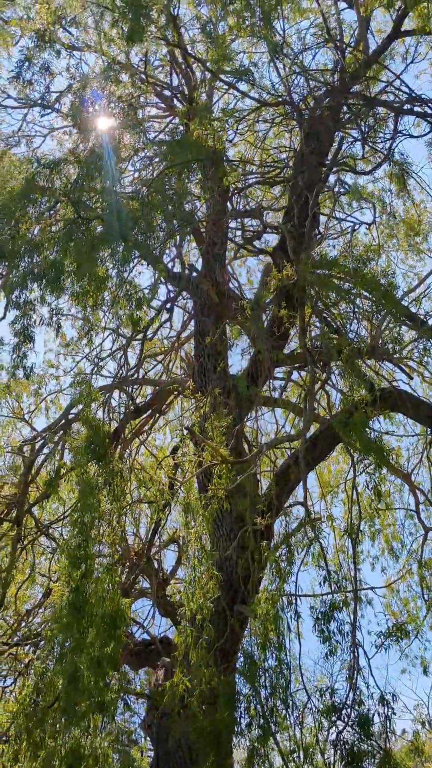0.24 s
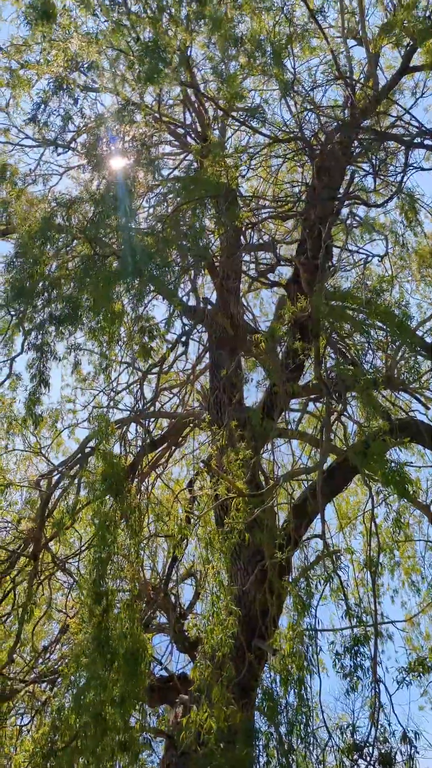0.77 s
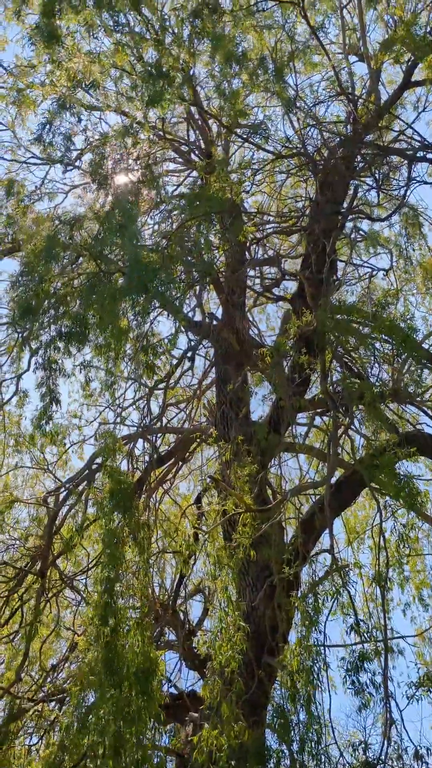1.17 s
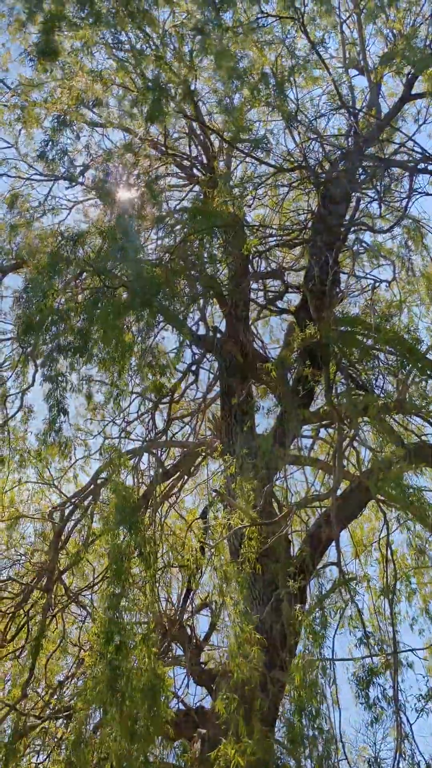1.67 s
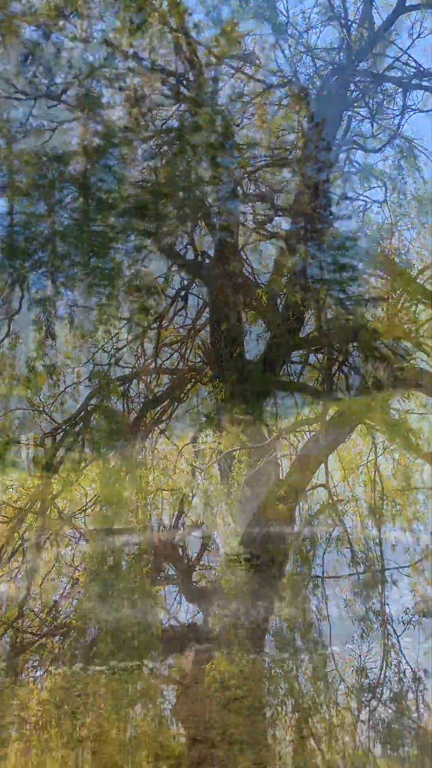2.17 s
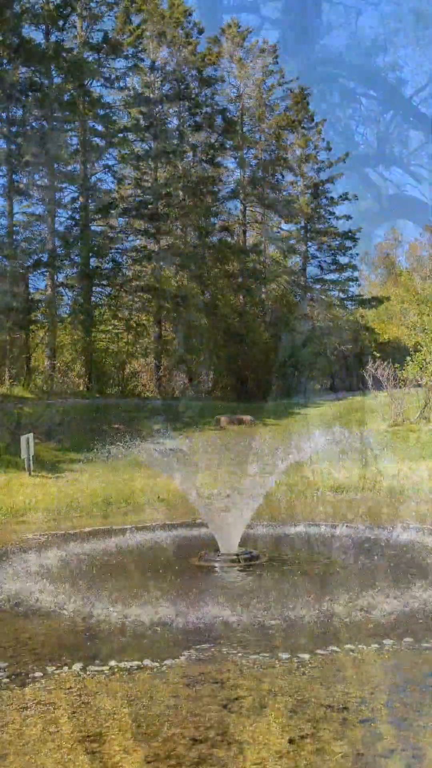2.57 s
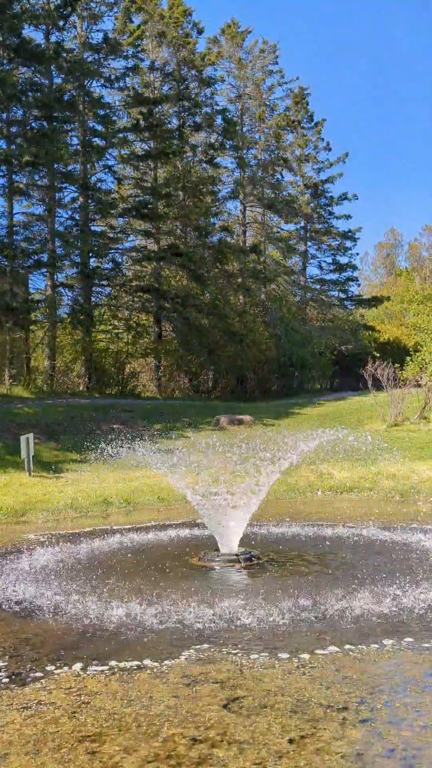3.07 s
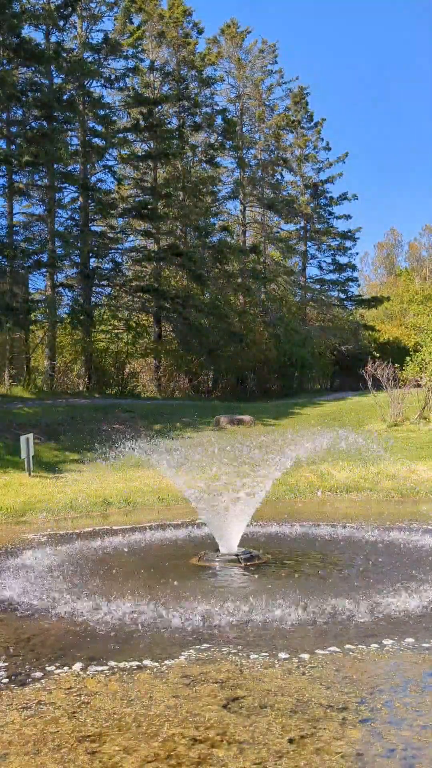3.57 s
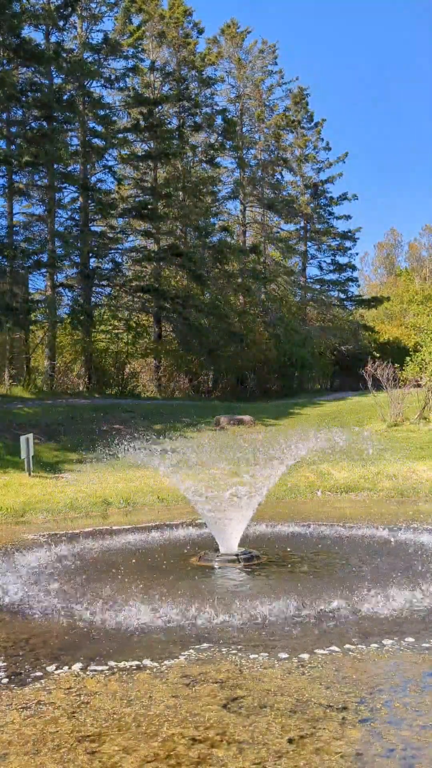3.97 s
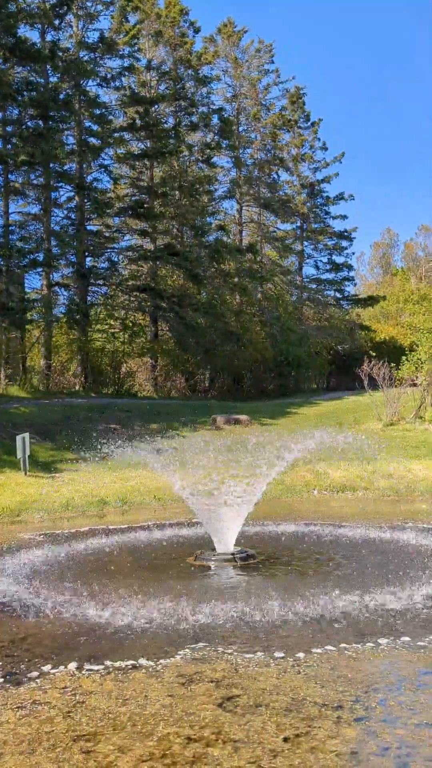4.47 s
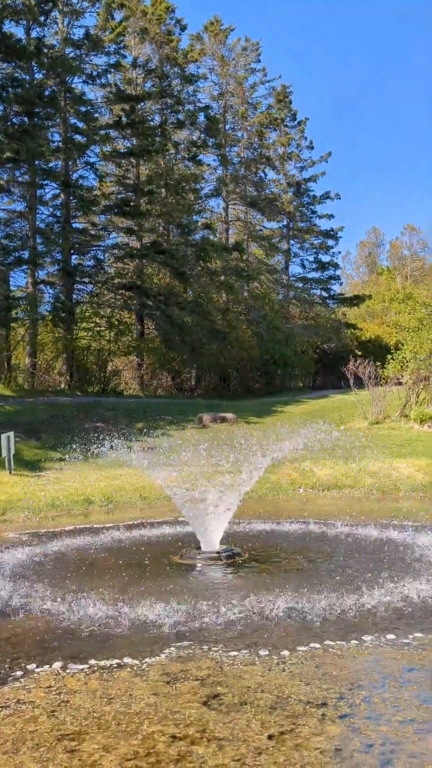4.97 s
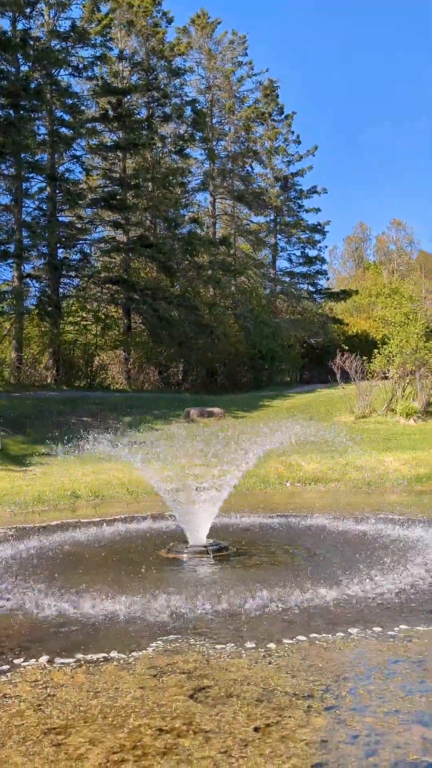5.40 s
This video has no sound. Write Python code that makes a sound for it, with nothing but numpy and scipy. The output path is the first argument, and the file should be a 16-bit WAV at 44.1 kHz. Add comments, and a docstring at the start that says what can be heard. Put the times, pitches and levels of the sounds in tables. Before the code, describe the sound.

From 0 to 1.5 s the park is very quiet: short, soft grass rustles at the start, near 0.5 s and from about 1.0 to 1.35 s, with tiny stalk snaps. A hush of leaves lies beneath, and low wind buffets mostly the right side, stronger around 0.6-1.2 s. Distant birds are barely audible: high notes at 0.1 and 1.3 s, a faint low one near 0.75 s. At 1.53 s a very quick fade brings in a far louder fountain, with a tiny dip near 1.68 s. Broad, bright spray hisses steadily on water, slightly brighter on the right, growing gently to the end. Countless drops tick; small plops ring irregularly, crowding around 3.7 s and 5.0-5.4 s. Sharp spatters stand out near 2.7, 3.1 and 5.1 s, with soft rising bloops mostly between 2.4 and 4.1 s. A low pump hum sits underneath. At 5.52 s a wind gust thumps both sides, then flutters.

```python
"""A few quiet steps rustle through grass in a park, close by, with wind on the two microphone ports and
a few distant birds; then a quick fade to a pond fountain. Its ring of spray hisses on the water, drops
tick and trap small bubbles, the pump hums below, and a last gust thumps the microphone. Noise is coloured
for spray, grass, leaves, pump and wind; decaying sines make bubbles, drops and snaps; near-sines, birds."""
import sys
import numpy as np
from scipy import signal
from scipy.fft import rfft, irfft
from scipy.io import wavfile
from scipy.ndimage import uniform_filter1d

SR = 44100
rng = np.random.default_rng(int(sys.argv[2]) if len(sys.argv) > 2 else 0)


def generate_wav(signal):
    """Clip the signal to [-1, 1] and save it as 16-bit WAV at the path in sys.argv[1]."""
    frames = np.transpose(np.atleast_2d(signal))
    scaled = np.clip(frames, -1, 1) * 32767
    pcm = np.round(scaled).astype(np.int16)
    wavfile.write(sys.argv[1], SR, pcm)


def attenuation_scalar(level_db):
    """Turn a level in dB into a linear amplitude multiplier (20 dB per decade)."""
    decades = np.asarray(level_db, float) / 20
    return 10 ** decades


N = 248724

PARK_END_S = 1.527  # the park ends and the fountain starts
RING_LAG = 4.72  # samples by which the left port hears the fountain later
# How the fountain fades in. Each row: time in seconds, level in dB.
FOUNTAIN_LEVEL = [(1.55, -38), (2.34, -35.5), (3.6, -34), (3.75, -33), (5.64, -32.5)]


def evened(x):
    """Scales to rms 1."""
    return x / np.sqrt(np.mean(x ** 2) + 1e-20)


def read_spectrum(points, hz):
    """Reads a table of (Hz, value) on a log frequency axis."""
    f, value = np.transpose(points)
    return np.interp(np.log(hz + 1), np.log(f + 1), value)


def level_curve(rows):
    """A table of (s, dB) drawn out to every sample."""
    return np.interp(np.arange(N) / SR, *np.transpose(rows))


def colour(x, points):
    """Filters by a spectrum of (Hz, dB)."""
    gain = attenuation_scalar(read_spectrum(points, np.fft.rfftfreq(N, 1 / SR)))
    return irfft(rfft(x) * gain, N)


def ports(x, lag):
    """One direction heard by two ports: the left one lags by some samples."""
    turn = np.exp(-2j * np.pi * lag * np.fft.rfftfreq(N))
    return np.array([irfft(rfft(x) * turn, N), x])


def swell(start, length, db, change_db, rise_s, fall_db_per_s):
    """Quick rise, a hold that drifts in level, then an even fall in dB."""
    t = np.arange(N) / SR - start
    level_db = db + change_db * np.clip(t / length, 0, 1)
    level_db -= fall_db_per_s * np.maximum(t - length, 0)
    return np.clip(t / rise_s, 0, 1) * attenuation_scalar(level_db)


def hiss(count, patchy_db, flicker_db):
    """White noises that share drifting time-frequency patches and a wide-band flicker."""
    shape = (N // 64 + 5, 129)
    patches = uniform_filter1d(rng.standard_normal(shape), 6, 1)
    patches = evened(uniform_filter1d(patches, 30, 0))
    flicker = evened(uniform_filter1d(rng.standard_normal(shape[0]), 12))[:, None]
    z = rng.standard_normal((count, *shape)) + 1j * rng.standard_normal((count, *shape))
    z *= attenuation_scalar(patchy_db * patches + flicker_db * flicker)
    noise = signal.istft(z.transpose(0, 2, 1), nperseg=256, noverlap=192)[1]
    return evened(noise[:, :N])


def bubble(hz, t60, glide=0.05, rise=0.4):
    """A trapped bubble rings and climbs in pitch as it nears the surface; peak 1."""
    t = np.arange(3000) / SR
    wave = np.sin(2 * np.pi * hz * t * (1 + glide * t / t60))
    wave *= attenuation_scalar(np.maximum(-60 * t / t60, -200)) * (t < 1.5 * t60)
    wave *= 1 - np.exp(-t * hz / rise)  # rise in cycles
    return wave / abs(wave).max()


def random_drops(count, per_s, lo_hz, hi_hz, cycles, spread_db, glide=0.17):
    """Random drops, one stream a direction; each of 12 sizes has its own train of hits."""
    out = np.zeros((count, N))
    draw = rng.random((count, N))
    strength = attenuation_scalar(spread_db * np.minimum(rng.exponential(1, (count, N)), 4))
    kind = rng.integers(0, 12, (count, N))
    for k, hz in enumerate(np.geomspace(lo_hz, hi_hz, 12)):
        shape = np.trim_zeros(bubble(hz, cycles / hz, glide), "b")
        hits = strength * (draw < per_s / count / SR) * (kind == k)
        # small drops spread over a wider band, so their energy grows with pitch
        shape = shape[None] * np.sqrt(hz) / np.linalg.norm(shape)
        out += signal.oaconvolve(hits, shape, axes=1)[:, :N]
    return evened(out)


def place_bubbles(events, lag, **shape):
    """Places single bubbles, rows of (s, peak dB, Hz, t60 s, left-right dB)."""
    out = np.zeros((2, N + 4000))
    for s, db, hz, t60, pan_db in events:
        at = round(s * SR)
        wave = attenuation_scalar(db) * bubble(hz, t60, **shape)
        out[0, at + round(lag):][:len(wave)] += wave * attenuation_scalar(pan_db / 2)
        out[1, at:at + len(wave)] += wave * attenuation_scalar(-pan_db / 2)
    return out[:, :N]


def fountain():
    """Spray and drops on the water, with large and deep bubbles and spatters that stand out."""
    return attenuation_scalar(level_curve(FOUNTAIN_LEVEL)) * splash() + large_bubbles() + spatters() + deep_bubbles()


def splash():
    """Spray lands along a ring, each part with its own lag; the rest reaches each port scattered."""
    # Share of the splash that comes straight from the ring. Each row: Hz, share from 0 to 1.
    direct = [(600, 0.96), (1400, 0.9), (2500, 0.65), (4500, 0.61), (6800, 1), (8000, 0), (9300, 0.48),
              (12000, 0.7), (14000, 0)]
    # Colour at each port, the left one shaded by the body. Each row: Hz, relative dB per Hz.
    spray_left = [(150, -8), (420, -9), (600, -6.5), (830, -10.5), (1400, -4), (2300, -2), (4300, -4),
                  (5400, -9.5), (6600, -10), (7700, -14), (10000, -13.5), (12000, -5), (14000, -16),
                  (15600, -10.5)]
    spray_right = [(150, -8.5), (420, -8.5), (600, -4.5), (830, -9), (1400, -1.5), (1900, -1.5),
                   (3800, -0.5), (5400, -4.5), (7000, -1.5), (8200, -7.5), (9400, -2), (11000, -6.5),
                   (12500, -2), (14000, -12), (15600, -13)]
    ring_width = 0.98  # samples by which the lag spreads to either side across the ring

    parts = hiss(count=5, patchy_db=1.0, flicker_db=0.98)
    # drops come in bunches
    bunches = attenuation_scalar(1.3 * evened(uniform_filter1d(rng.standard_normal(N), size=1200)))
    middle = random_drops(count=5, per_s=700, lo_hz=950, hi_hz=2900, cycles=20, spread_db=3.2)
    fine = random_drops(count=5, per_s=3000, lo_hz=3430, hi_hz=14200, cycles=11, spread_db=3.0)
    low = random_drops(count=5, per_s=67, lo_hz=349.3, hi_hz=900, cycles=36.0, spread_db=2.0, glide=0.615)
    parts += attenuation_scalar(-9.5) * bunches * middle + attenuation_scalar(-4.5) * fine + attenuation_scalar(-23) * low

    lags = RING_LAG + ring_width * np.linspace(-1, 1, 3)
    ring = sum(ports(part, lag) for part, lag in zip(parts, lags)) / np.sqrt(3)
    scattered = parts[3:]
    share = np.clip(read_spectrum(direct, np.fft.rfftfreq(N, 1 / SR)), 0, 1)
    left, right = irfft(np.sqrt(share) * rfft(ring) + np.sqrt(1 - share) * rfft(scattered), N)
    return evened(np.array([colour(left, spray_left), colour(right, spray_right)]))


def large_bubbles():
    """Each large bubble rings briefly, with a shorter, higher slap at its onset."""
    # Each row: start in seconds, peak in dB of the ring, starting pitch in Hz, left-right in dB.
    plops = [(1.536, -27, 2050, 8), (1.614, -32.5, 1430, 0), (1.692, -26.5, 1980, -1.0),
             (1.697, -31, 1500, -1.5), (1.951, -26.5, 1520, 0), (2.018, -29.5, 1770, -1.0),
             (2.3263, -24.5, 1660, -1.5), (2.506, -40, 1520, -1.5), (2.614, -29, 2500, -4),
             (2.667, -27, 1460, -1), (2.864, -24, 2200, -2), (2.901, -31, 2070, -3), (3.153, -31, 1380, -4),
             (3.223, -28, 1970, -4), (3.364, -30.5, 1340, -2.5), (3.714, -23.5, 1600, 0),
             (3.717, -37, 1070, -3), (3.738, -27, 2000, -2.5), (3.778, -31, 1800, -2.5),
             (3.866, -30, 1420, -3), (4.063, -27, 2340, -2.5), (4.252, -26, 2800, -3),
             (4.431, -27, 1510, -2), (4.651, -27.5, 1400, -3), (4.689, -25.5, 1900, -1),
             (4.847, -27, 2630, 1), (4.95, -32, 1500, -2.5), (4.968, -24, 2270, -1),
             (5.059, -30.5, 1290, -4), (5.082, -23.5, 1900, -2.5), (5.121, -27, 1940, -2.5),
             (5.198, -24, 1740, -3), (5.232, -24, 2010, -2.0), (5.402, -31, 2330, -6),
             (5.424, -26, 1990, -7)]
    slap_db, slap_t60_s, ring_t60_s = -7, .0025, 0.0098
    slaps = [(s, db + slap_db, 1.19 * hz, slap_t60_s, pan_db) for s, db, hz, pan_db in plops]
    rings = [(s, db, hz, ring_t60_s, pan_db) for s, db, hz, pan_db in plops]
    return place_bubbles(rings + slaps, RING_LAG)


def deep_bubbles():
    """Deep bubbles start softly and climb far in pitch while they ring."""
    # Each row: start in seconds, peak in dB, starting pitch in Hz, ring t60 in seconds.
    bloops = [(2.425, -51, 375, 0.11), (2.862, -34.5, 946, 0.026), (2.864, -46, 570, 0.034),
              (3.27, -48, 455, 0.1), (3.465, -44, 535, .086), (3.585, -34.5, 990, .03),
              (3.61, -44, 553, 0.05), (3.805, -40.5, 555, .05), (3.86, -40, 584, 0.085),
              (4.077, -37.5, 486, 0.096), (5.15, -45, 535, .045)]
    climb_per_s = 6.7  # growth of the mean pitch since onset; the momentary pitch climbs twice as fast
    return sum(place_bubbles([(s, db, hz, t60, -1)], RING_LAG, glide=climb_per_s * t60, rise=3.3)
               for s, db, hz, t60 in bloops)


def spatters():
    """Each spatter of fine drops is a first tick and a dying cluster of smaller ones."""
    # Each row: start in seconds, peak in dB of the first tick, centre in Hz, t60 of the cluster in seconds.
    ticks = [(2.0108, -28, 6710, .012), (2.2256, -26.5, 9100, 0.0085), (2.7293, -20, 10400, .002),
             (2.8987, -29, 9100, .015), (3.086, -23.5, 6990, 0.048), (3.214, -26, 10200, .02),
             (3.341, -31, 9400, .01), (3.362, -27.5, 9400, .015), (3.382, -27, 9100, .01),
             (3.5672, -31, 10000, .01), (3.7418, -26.5, 6600, 0.0082), (4.3726, -29, 7080, .012),
             (5.094, -23, 9550, .01), (5.3437, -31, 9040, 0.0092), (5.5228, -36, 6830, .012)]
    shade_db_per_khz = -1.3  # the left port hears less of a tick the higher it is
    draws = rng.random((len(ticks), 9, 3))
    draws[:, 0] = [0, 1, .5]  # the first tick: no delay, full size, centre pitch
    drops = []
    for (s, db, hz, t60), cluster in zip(ticks, draws):
        for late, size, pitch in cluster:
            drop_db = db - 30 * late - 6 * (1 - size)
            drop_hz = hz * (.85 + .3 * pitch)
            drops.append((s + .5 * t60 * late, drop_db, drop_hz, .0022, shade_db_per_khz * hz / 1000))
    return place_bubbles(drops, RING_LAG)


def steps():
    """Blades rustle under each step, brighter when brushed; stalks snap; leaves hush behind."""
    # Grass under the feet. Each row: start in seconds, length in seconds, level in dB,
    # change over its length in dB, treble lift in dB.
    rustles = [(0, 0.041, -59.5, 2, -5), (.092, 0.017, -64.5, 5, -16), (.255, .03, -75, -5, 13),
               (0.453, 0.017, -66, -9, -3), (0.469, .13, -57.5, 5, 7), (.82, 0.19, -74.5, 2.0, -4),
               (1.024, .024, -60, -1.0, 11), (1.05, .31, -64.5, -4, -4), (1.452, 0.077, -73, 7, -4)]
    # Colour of the grass. Each row: Hz, relative dB per Hz.
    grass_colour = [(180, -48), (300, -23), (643, -10.5), (1060, -13), (1210, -1), (2260, 0.5),
                    (2900, -2.5), (3660, 1), (5630, -8.5), (6980, -11), (12700, -19), (15700, -21)]
    # Snapping stalks. Each row: start in seconds, peak in dB, centre in Hz.
    stalks = [(0.0104, -49, 3500), (0.0277, -49.5, 1960), (0.033, -47.5, 1270), (0.099, -44.5, 2110),
              (0.233, -55, 1960), (0.382, -54, 1900), (0.4609, -53, 2270), (1.1094, -55, 2650),
              (1.181, -58, 1500), (1.292, -57, 1400), (1.492, -51, 1820)]

    blades = hiss(count=3, patchy_db=1.5, flicker_db=1.2)
    crackle = random_drops(count=3, per_s=2500, lo_hz=1230, hi_hz=12000, cycles=11, spread_db=4.5)
    blades += attenuation_scalar(-11.5) * crackle
    pair = evened(colour(ports(blades[0], lag=-6.0) + 1.75 * blades[1:], grass_colour))
    treble = colour(pair, [(4500, -35), (6000, -2.5)])
    shapes = np.array([swell(*row[:4], rise_s=.004, fall_db_per_s=400) for row in rustles])
    lifts = attenuation_scalar([row[4] for row in rustles])
    grass = shapes.sum(0) * (pair - treble) + lifts @ shapes * treble
    snaps = [(s, db, hz, .004, 1.5) for s, db, hz in stalks]
    return grass + leaves() + place_bubbles(snaps, lag=0)


def leaves():
    """A steady hush of leaves: patchy noise, separate at each port."""
    # Colour of the leaves. Each row: Hz, relative dB per Hz.
    leaf_colour = [(200, -2), (350, -5.5), (900, -3.5), (1400, -1), (3400, 0), (5400, -6), (7000, -3),
                   (9000, -15), (13800, -16.5), (15700, -23)]
    return attenuation_scalar(-69.5) * evened(colour(hiss(count=2, patchy_db=2.2, flicker_db=1.0), leaf_colour))


def pump():
    """A low rumble, nearly alike in both ports, with blurred hum at the motor's orders."""
    # Hum of the motor. Each row: multiple of its rate, gain in dB, half-width in Hz.
    orders = [(1, -1, 23), (2, -1, 7.7), (3, -3, 20)]
    # Colour of the rumble. Each row: Hz, relative dB per Hz.
    rumble_colour = [(15, -44), (25, -27), (38, -2.5), (64, 3.5), (118, 2), (141, -1.5), (257, -4),
                     (400, -7.5), (520, -39), (880, -120)]
    motor_hz, rumble_db = 59, -52.5

    hz = np.fft.rfftfreq(N, 1 / SR)
    hum = sum(attenuation_scalar(db) / (1 + ((hz - k * motor_hz) / width) ** 4) for k, db, width in orders)
    both, left, right = rng.standard_normal((3, N))
    rumble = colour(both + .25 * np.array([left, right]), rumble_colour)
    rumble = irfft(rfft(rumble) * (1 + hum), N)
    fade_db = level_curve(FOUNTAIN_LEVEL)
    # the pump follows half of the fountain's fade
    return attenuation_scalar(rumble_db + 0.5 * (fade_db - fade_db.mean())) * evened(rumble)


def wind():
    """Low buffeting: lumpy and mostly on the right port in the park, the last gust on both alike."""
    # One gust in the park, one at the pond. Each row: start in seconds, length in seconds,
    # level in dB, change over its length in dB.
    gusts = [(.605, .615, -59.5, -7), (5.522, .045, -34, -1.5)]
    # Colours of the park wind and of the last gust. Each row: Hz, relative dB per Hz.
    park_colour = [(25, -23), (45, -0.5), (70, -3), (110, -2.5), (160, -15.5), (250, -28.5), (420, -41),
                   (700, -74)]
    pond_colour = [(25, -30), (40, -10), (55, -6), (75, -3), (100, -10), (200, -18.5), (280, -28.5),
                   (500, -53)]
    breeze_db, tail_db, rise_s = -68.5, -16, .012  # steady park breeze; pond tail against its gust

    both, left, right, lumps = rng.standard_normal((4, N))
    own = np.array([left, right])
    lumps = uniform_filter1d(uniform_filter1d(lumps, size=600), size=600)
    lumps = attenuation_scalar(3.0 * evened(lumps))
    park, pond = [swell(*row, rise_s, fall_db_per_s=600) for row in gusts]
    park = (attenuation_scalar(breeze_db) + park) * evened(lumps) * (np.arange(N) < PARK_END_S * SR)
    # the last gust dies down to a flutter
    pond = pond + attenuation_scalar(tail_db) * swell(*gusts[1], rise_s, fall_db_per_s=6)
    out = 0
    for level, tone, shared, pan_db in [(park, park_colour, .6, -9), (pond, pond_colour, 3, 0.5)]:
        pan = attenuation_scalar([[pan_db / 2], [-pan_db / 2]])
        out = out + evened(colour(shared * both + own, tone)) * pan * level
    return out


def birds():
    """Faint distant near-sine notes, unsteady after their way through the trees."""
    # Each row: start in seconds, length in seconds, pitch in Hz, slide in Hz, level in dB.
    notes = [(.1, .13, 3680, -40, -76), (.735, .285, 465, 0, -83), (1.312, .088, 4940, -280, -77.5)]
    fade_db = -6  # each note weakens towards its end
    out = np.zeros((2, N))
    for start, length, hz, slide_hz, db in notes:
        t = np.arange(0, length, 1 / SR)
        waver = evened(uniform_filter1d(rng.standard_normal((2, N)), size=90))
        waver = attenuation_scalar(4 * waver)[:, :len(t)]
        note = np.sqrt(2) * np.sin(2 * np.pi * (hz + slide_hz * t / length / 2) * t)
        note = note * attenuation_scalar(db + fade_db * t / length) * waver
        out[:, round(start * SR):][:, :len(t)] += note * signal.windows.tukey(len(t), .3)
    return out


def scene():
    """The park, then the fountain after a quick fade; the level dips briefly early at the pond."""
    # The dip. Its values: centre in seconds, half length in seconds, depth in dB.
    dip_at = (1.678, 0.0044, -12)
    t = np.arange(N) / SR
    pond_share = np.clip((t - PARK_END_S) / .008, 0, 1)
    s, half, db = dip_at
    dip = attenuation_scalar(db * np.exp(-((t - s) / half) ** 4))
    park = steps() + birds()
    return (1 - pond_share) * park + wind() + pond_share * dip * (fountain() + pump())


def roll_off(x):
    """The treble ends steeply here."""
    return signal.sosfilt(signal.butter(12, 15870, fs=SR, output="sos"), x)


def record(dry):
    """The microphone loses the deepest bass."""
    bass_cut = signal.butter(N=4, Wn=39.7, btype="high", fs=SR, output="sos")
    mix = signal.sosfilt(bass_cut, dry)
    return roll_off(mix)


dry = scene()
out = record(dry)
generate_wav(out)
```